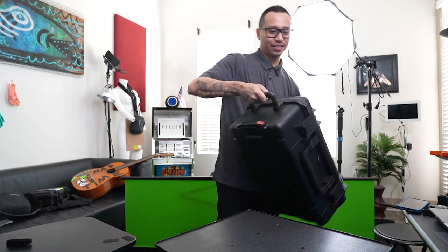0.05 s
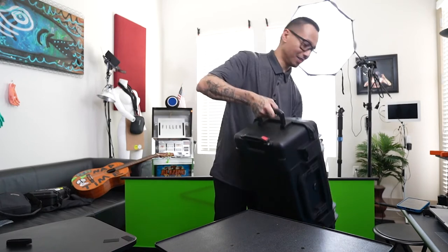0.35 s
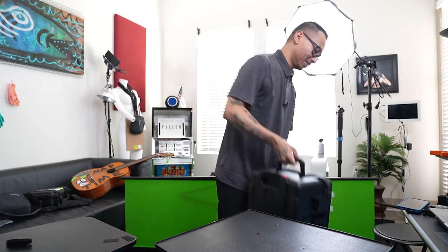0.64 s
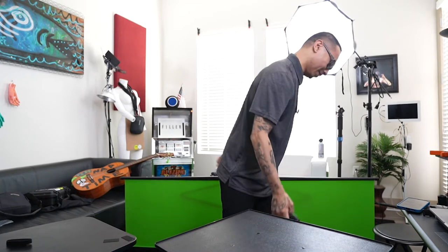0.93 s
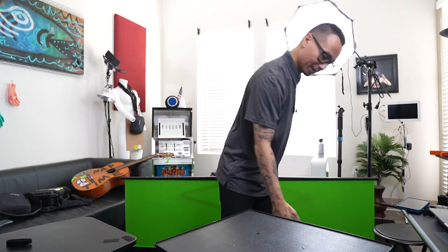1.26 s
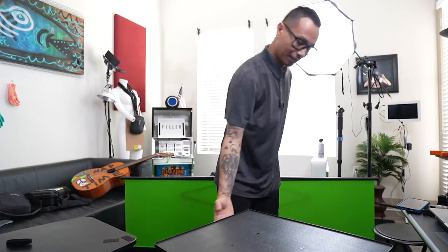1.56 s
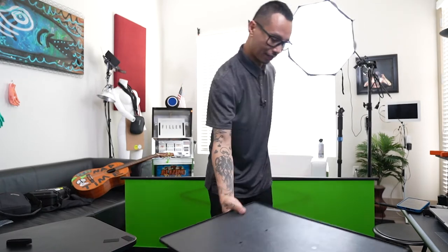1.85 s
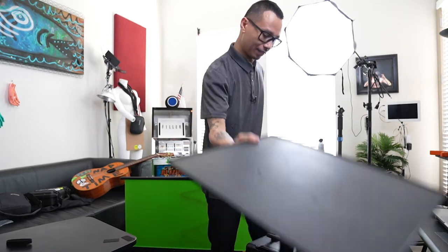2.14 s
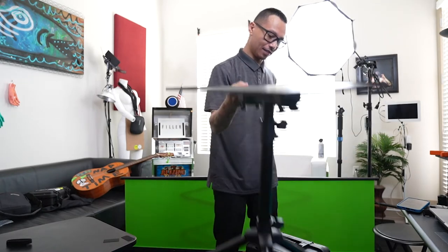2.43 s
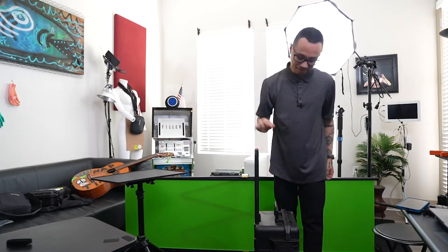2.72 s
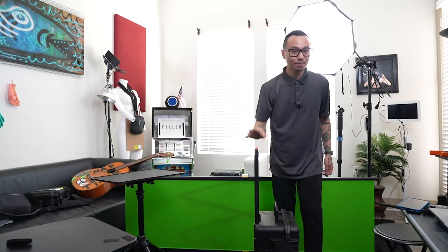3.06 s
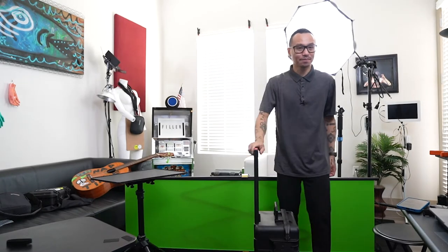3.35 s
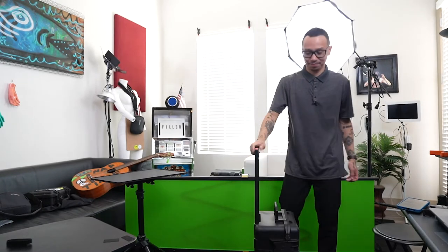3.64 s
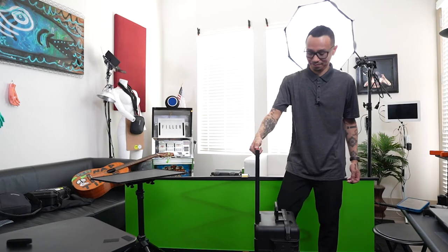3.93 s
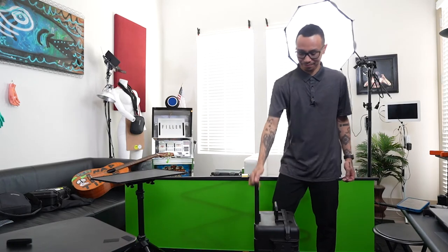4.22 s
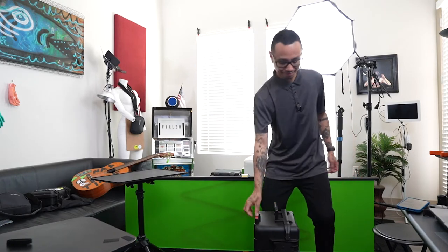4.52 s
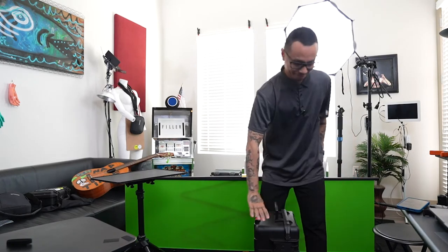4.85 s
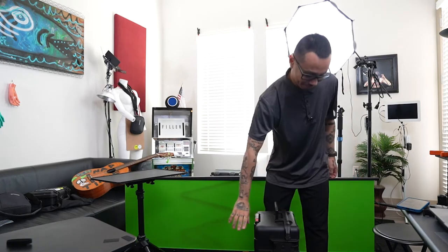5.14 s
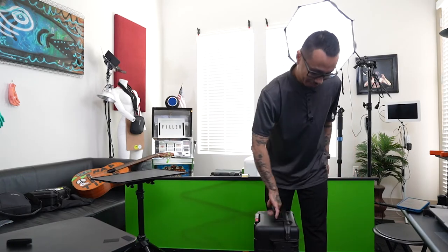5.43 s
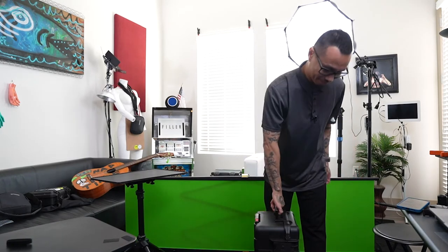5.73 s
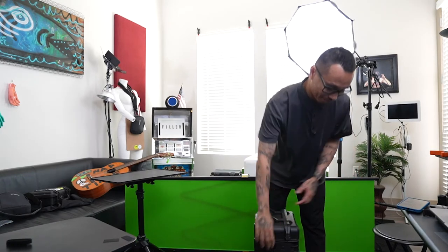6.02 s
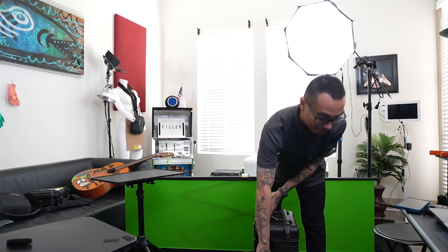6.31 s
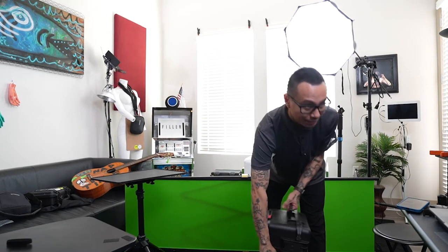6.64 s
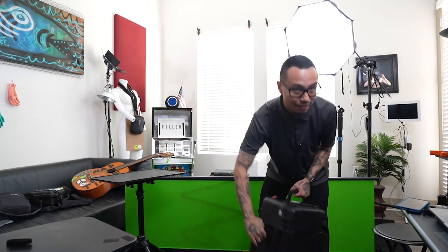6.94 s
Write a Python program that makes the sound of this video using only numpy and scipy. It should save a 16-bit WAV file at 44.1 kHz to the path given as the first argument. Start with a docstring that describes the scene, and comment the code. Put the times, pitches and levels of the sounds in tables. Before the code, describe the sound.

A knock and a brush of clothing open the scene as a hard plastic case is handled close to the microphone. At about 1.1 seconds the loaded case thumps onto the floor and rocks, filling the room with a short echo. A table top is bumped at 1.5 seconds, and its metal stand lands with a loud, ringing clang at 2 seconds, then a lighter knock at 2.5. Around 3 to 3.2 seconds the case's telescopic handle clacks out to its stop. From 4.1 to 4.5 seconds it scrapes back down its guides with several snaps, and after a brief rustle it slams shut at about 5.1. From there until nearly 7 seconds, hands knock irregularly on the hollow shell, latches click and clothes rustle softly. A faint, low room hush lies underneath.

```python
"""A live room, one microphone, a hard plastic case handled close by. The loaded case is swung off a table
and thumps onto the floor; the table on its stand is grabbed, shoved aside and lands with a clang. The
telescopic handle is pulled out, scrapes back down its guides and slams shut; then hands knock about on
the shell and latches while clothes rustle. Each blow is a burst of contact noise, the ring of the struck
body and the room's echo; rubbing is a stream of tiny slips."""
import sys
import numpy as np
from scipy import signal
from scipy.fft import rfft, irfft, next_fast_len
from scipy.io import wavfile
from scipy.ndimage import uniform_filter1d, map_coordinates

SR = 44100
rng = np.random.default_rng(int(sys.argv[2]) if len(sys.argv) > 2 else 0)


def to_wav(s):
    """Save 16-bit WAV."""
    ch = np.atleast_2d(s).T  # columns
    pcm = np.round(np.clip(ch, -1, 1) * 32767)  # PCM
    wavfile.write(sys.argv[1], SR, pcm.astype(np.int16))


N = 307451
TIME = np.arange(N) / SR
AGE = np.arange(SR) / SR  # seconds since a blow
DIP_START_S, DIP_END_S = 2.752, 2.772  # the level dips briefly

def amp(db):
    """Decibels to gain."""
    return 10 ** (np.asarray(db) / 20)

def unit(x):
    """Scale to rms 1."""
    return x / np.sqrt(np.mean(x ** 2) + 1e-20)

def normed(x):
    """Scale to energy 1."""
    return x / (np.linalg.norm(x) + 1e-20)

def along(points, hz):
    """Read (f/Hz, value) points on a log frequency axis."""
    f, values = np.transpose(points)
    return np.interp(np.log(hz + 1), np.log(f + 1), values)

def wobble(rate):
    """A smooth random curve, rate knots a second."""
    return map_coordinates(rng.standard_normal(int(N * rate / SR) + 4), [TIME * rate])

def filtered(x, response):
    """Filter x by a gain given as a function of frequency."""
    size = next_fast_len(len(x) + SR // 4)
    return irfft(rfft(x, size) * response(np.fft.rfftfreq(size, 1 / SR)), size)[:len(x)]

def coloured(x, spectrum):
    """Shape x by a (f/Hz, level/dB) spectrum, at rms 1."""
    return unit(filtered(x, lambda hz: amp(along(spectrum, hz))))

def slips(rate, hiss):
    """Friction: tiny slips of uneven size, rate a second, over a smooth hiss."""
    grains = (rng.random(N) < rate / SR) * rng.standard_normal(N)
    return unit(grains) + hiss * rng.standard_normal(N)

def stroke(start, end, rise_db_per_s=700, fall_db_per_s=232):
    """Gain of one movement: it swells up to its start, holds, and dies away after its end."""
    return amp(-rise_db_per_s * np.maximum(start - TIME, 0) - fall_db_per_s * np.maximum(TIME - end, 0))

def progress(start, end):
    """An even ramp from 0 to 1 between two times."""
    return np.clip((TIME - start) / (end - start), 0, 1)

def arch(start, end):
    """A rounded swell between two times."""
    return np.sqrt(np.abs(np.sin(np.pi * progress(start, end))))

# The quiet room at the microphone: f/Hz, level/dB
ROOM_HUSH = [(15, -37), (25, -26), (164, -2), (281, -2), (368, -17.5), (598, -6), (945, -15), (2170, -16.5),
             (4040, -27.5), (13500, -33.5), (15500, -37)]
def room_tone(level_db=-52.5):
    """The room's steady low hush."""
    return amp(level_db) * coloured(rng.standard_normal(N), ROOM_HUSH)

# Strokes of cloth and hand: start t/s, end t/s, relative rustle, hiss and rumble level/dB
HAND_STROKES = [(0.0, 0.027, -29.5, -32, -23.5), (0.094, 0.438, -36.5, -51.5, -36.5),
                (0.407, 0.482, -39, -43.5, -44), (0.547, 0.88, -53, -69, -45.5),
                (0.863, 0.876, -64, -52.5, -44.5), (1.4, 2.7, -56, -62.5, -51),
                (3.982, 4.044, -43, -61, -44), (4.73, 4.9, -45, -60, -44), (5.3, 5.773, -53.5, -61, -54),
                (5.8, 5.937, -49, -54, -46), (5.993, 6.154, -55.5, -62, -58),
                (6.217, 6.255, -34, -40.5, -26), (6.308, 6.56, -42.5, -55, -35),
                (6.635, 6.77, -50, -54.5, -46.5), (6.79, 6.912, -43, -46, -52)]
# Spectra of the rustle, the hiss of brisk strokes and the jostled case: f/Hz, level/dB
CLOTH_RUSTLE = [(410, -17), (700, -8), (1050, -5.5), (1780, 3.5), (1920, 3), (2160, 3.5), (3270, -4.5),
                (4890, -10.5), (12900, -31.5), (15500, -35)]
FIBRE_HISS = [(1000, -35), (2800, 0), (5500, 1.5), (8000, -6), (12500, -11.5), (15500, -17)]
CASE_RUMBLE = [(24, -54), (40, -56), (69, -25), (113, 13), (178, 13.5), (227, 12.5), (483, 6), (533, 4),
               (1200, -5), (1560, -78), (2640, -120)]
def handling(rustle_db=-1, hiss_db=-1, rumble_db=-3):
    """Close up, cloth brushes the shell in clumps of tiny slips while the case rumbles in the hand."""
    rustle, hiss, rumble = sum(np.outer(amp(levels_db), stroke(start, end))
                               for start, end, *levels_db in HAND_STROKES)
    cloth = coloured(slips(rate=1700, hiss=1.42), CLOTH_RUSTLE) * amp(rustle_db + 1.7 * wobble(35))
    fibres = coloured(slips(rate=3000, hiss=1.3), FIBRE_HISS) * amp(hiss_db + 2.9 * wobble(50))
    jostle = coloured(slips(rate=220, hiss=0.86), CASE_RUMBLE) * amp(rumble_db + 4.7 * wobble(13))
    return rustle * cloth + hiss * fibres + rumble * jostle

# Surfaces catching: start t/s, end t/s, centre f/Hz, level/dB
SURFACE_CHAFES = [(0, 0.078, 5800, -34), (0.166, 0.304, 1750, -39.5), (0.46, 0.534, 1740, -36.5),
                  (1.748, 1.778, 1400, -43), (1.832, 1.96, 1580, -45.5), (4.052, 4.17, 1410, -30),
                  (4.727, 4.893, 2140, -42)]
def chafing(relative_width=0.13):
    """A catching surface sings briefly in one rough, narrow band."""
    out = np.zeros(N)
    for start, end, hz, db in SURFACE_CHAFES:
        band = filtered(rng.standard_normal(N), lambda f: 1 / (1 + ((f / hz - 1) / relative_width) ** 4))
        out += amp(db) * arch(start, end) * unit(band)
    return out

# The room's reverberation time: f/Hz, t60/s
ROOM_DECAY = [(100, 0.54), (260, 0.78), (700, 0.77), (1800, 0.83), (5000, 0.81), (12000, 0.43)]
# Tone of its echo: f/Hz, level/dB
ROOM_TIMBRE = [(50, -27), (100, -10), (150, 1), (500, 0), (2000, 1), (5000, -3), (12000, -1)]
def room_tail(colour, hold_s=0.074):
    """The room answers a blow: dense echoes hold a moment, then die away."""
    hz, t, noise = signal.stft(rng.standard_normal(SR), SR, nperseg=512)
    fall_db = -60 * (np.hypot(t, hold_s) - hold_s) / along(ROOM_DECAY, hz)[:, None]
    tone_db = along(colour, hz) + along(ROOM_TIMBRE, hz)
    _, tail = signal.istft(noise * amp(fall_db + tone_db[:, None]), SR, nperseg=512)
    return normed(tail[:SR])

def ringing(modes, detune):
    """Damped modes, struck at slightly new strengths; the place of the blow shifts their pitch."""
    pitch = 1 + detune * rng.uniform(-1, 1)
    return sum(amp(db + rng.normal(0, 0.57) - 60 * AGE / t60) * np.sin(2 * np.pi * pitch * hz * AGE)
               for hz, db, t60 in modes)

# Edges of a blow's four bands (thud, knock, clack, click): f/Hz
BAND_EDGES = [65, 260, 900, 3500, 13500]
def blows(rows, modes, colour, ring_db, room_db, room_ring_db, detune=0):
    """Each blow is a burst of small contacts, the ring of the struck body, and the room's echo of both."""
    out = np.zeros(N + SR)
    bands = [signal.butter(3, edges, "band", fs=SR, output="sos")
             for edges in zip(BAND_EDGES, BAND_EDGES[1:])]
    for start, *levels_db, contact_s in rows:
        contact_age = AGE / contact_s
        rise = 1 - np.exp(-contact_age ** 2 / 2)
        crack = normed(coloured(rng.standard_normal(SR), colour) * rise * np.exp(-contact_age))
        ring = normed(ringing(modes, detune) * rise)
        ring_echo = normed(signal.fftconvolve(ring, room_tail(ROOM_TIMBRE))[:SR])
        echo = (room_tail(colour) + amp(room_ring_db) * ring_echo) * rise * (1 - np.exp(-AGE / 0.0014))
        heard = crack + amp(ring_db) * ring + amp(room_db) * echo
        if start < DIP_START_S:
            heard *= start + AGE < DIP_START_S  # the tail breaks off at the dip
        for band, db in zip(bands, levels_db):  # where and how hard it lands sets its colour
            part = signal.sosfilt(band, heard)
            peak_rms = np.sqrt(uniform_filter1d(part[:SR // 8] ** 2, size=441).max())
            out[round(start * SR):][:SR] += amp(db) * part / peak_rms
    return out[:N]

def touched(rows, touch):
    """Light blows: the hardness of the touch shares each one's level out among the bands."""
    soft_db, hard_db = np.transpose(touch)
    return [(start, *(db + soft_db + hardness * (hard_db - soft_db)), contact_s)
            for start, db, hardness, contact_s in rows]

# The handle's jolts: t/s, thud, knock, clack and click level/dB, contact t/s
HANDLE_HITS = [(0.002, -29, -28, -31.5, -36, 0.002), (2.979, -30.5, -29, -27.5, -40, 0.014),
               (3.204, -24.5, -25, -24, -34.5, 0.011), (5.083, -27, -23.5, -18.5, -33, 0.0055)]
# Its ringing modes: f/Hz, level/dB, t60/s
HANDLE_MODES = [(97.7, -9, 0.96), (159.4, -1, 0.15), (272, -18.5, 0.19), (386, 4, 0.076), (604, -2.5, 0.09),
                (986, -16, 0.081), (2000, -20, 0.0042)]
# Its crowd of dense, damped modes: f/Hz, level/dB
HANDLE_TIMBRE = [(35, -56), (60, -34), (83, -20), (107, -9.5), (385, 2.5), (497, -1.5), (657, 0), (756, -7),
                 (1550, -13), (1740, -13.5), (2780, -17), (7200, -22), (15500, -38)]
def handle_clatter():
    """The telescopic tubes rattle and reach their stops, with plenty of room behind them."""
    return blows(HANDLE_HITS, HANDLE_MODES, HANDLE_TIMBRE, ring_db=-3.5, room_db=9, room_ring_db=-16)

# Bumps on the shell: t/s, level/dB, hardness 0-1, contact t/s
SHELL_HITS = [(0.279, -36.5, 1, 0.0028), (1.319, -28, 1, .002), (2.075, -18, 0.44, 0.00047),
              (3.903, -26.5, 0.41, 0.0084), (4.257, -25, 0.2, 0.0088), (4.19, -32, .05, 0.0022),
              (4.51, -27.5, 0.56, 0.0021), (4.712, -23, 0.48, 0.0057), (4.982, -24.5, 0.02, 0.0083),
              (5.095, -19, 0.4, 0.0015), (5.111, -17.5, 0.6, .0008), (5.428, -26, 0.65, 0.00077),
              (5.51, -17.5, 1, 0.00028), (5.637, -26, 1, 0.00094), (5.841, -27, 0.5, 0.00052),
              (5.986, -40.5, 0.2, 0.0014), (6.197, -21, 0.08, 0.0021), (6.212, -24, 0, 0.00028),
              (6.384, -20, 0.86, 0.00015), (6.446, -24.5, 0.45, .0006), (6.265, -34, .45, 0.0076),
              (6.732, -28, 0, 0.0054), (6.775, -32.5, 0.27, 0.002)]
# Offset of each band, thud to click: soft level/dB, hard level/dB
SHELL_TOUCH = [(1, -1), (-9, 3), (-13.5, -7), (-33.5, -28.5)]
# The shell's ringing modes: f/Hz, level/dB, t60/s
SHELL_MODES = [(150.8, -3.5, 0.18), (256.5, -8, 0.069), (381, -3.5, 0.038), (649, 0, 0.031),
               (733, -14.5, 0.037), (1430, 9.5, 0.009)]
# Its dense, damped modes: f/Hz, level/dB
SHELL_TIMBRE = [(35, -59), (60, -12), (139, -9.5), (215, -15.5), (320, -7.5), (642, -15), (1170, -19),
                (1450, -21), (3840, -31), (10700, -34.5), (15500, -57)]
def shell_knocks():
    """Hands, grip and once the stand's leg bump the plastic shell near the microphone, each time in a new spot."""
    hits = touched(SHELL_HITS, SHELL_TOUCH)
    return blows(hits, SHELL_MODES, SHELL_TIMBRE, ring_db=7.5, room_db=1.5, room_ring_db=-6.5, detune=0.09)

# Snaps: t/s, level/dB, hardness 0-1, contact t/s
LATCH_HITS = [(0.842, -36.5, 0.04, .0006), (1.112, -40, 0.1, 0.00067), (2.531, -21.5, .15, 0.00072),
              (3.229, -17.5, 0.1, 0.00092), (4.249, -20, 0.46, 0.002), (4.343, -27.5, 0.5, .0008),
              (4.388, -24.5, .25, 0.0014), (4.429, -25.5, 0.83, 0.0018), (4.911, -41.5, 0.9, 0.00051),
              (6.334, -37.5, 0.7, 0.0045), (6.445, -21, 0.02, 0.0021), (6.486, -33.5, 1, 0.0023)]
# Offset of each band, thud to click: soft level/dB, hard level/dB
LATCH_TOUCH = [(3.5, -38), (3.5, -9), (0, 6.5), (-20.5, -26)]
# A latch's ringing modes: f/Hz, level/dB, t60/s
LATCH_MODES = [(146.5, -10, 0.22), (334, 5.5, 0.021), (1020, 6, 0.011), (1336, -21, 0.048),
               (2490, -11, 0.028), (3880, -19, 0.021), (7550, -13, 0.0048)]
def latch_snaps():
    """Catches, joints and latches snap, close and fairly dry."""
    hits = touched(LATCH_HITS, LATCH_TOUCH)
    return blows(hits, LATCH_MODES, HANDLE_TIMBRE, ring_db=-0.5, room_db=-6, room_ring_db=-6)

# The case meets the floor: t/s, thud, knock, clack and click level/dB, contact t/s
CASE_HITS = [(1.121, -15.5, -19.5, -19, -34.5, 0.0048), (1.141, -15, -25.5, -27.5, -33.5, 0.0041),
             (1.208, -25, -29.5, -26, -47, 0.0017)]
# The loaded case's ringing modes: f/Hz, level/dB, t60/s
CASE_MODES = [(151.7, 4.5, 0.094), (222, -5.5, 0.074), (742, -20, 0.029), (1120, -9, 0.024),
              (1530, -19, 0.044)]
# Its dense, damped modes: f/Hz, level/dB
CASE_TIMBRE = [(35, -53), (60, -42), (167, -7), (231, 2), (272, -21.5), (497, 1), (546, -6), (810, -11),
               (910, -16), (1520, -16), (2010, -25.5), (2650, -25), (15500, -50)]
def case_drop():
    """The loaded case lands and rocks; its thump fills the room."""
    return blows(CASE_HITS, CASE_MODES, CASE_TIMBRE, ring_db=-6.5, room_db=6, room_ring_db=-11.5)

# Ticks of the fittings: t/s, click level/dB
FITTING_HITS = [(1.319, -38), (1.492, -49), (2.074, -38), (3.229, -28.5), (5.091, -34), (5.509, -40.5),
                (5.635, -44), (5.642, -37.5), (6.199, -39), (6.518, -42.5)]
# Their bright spectrum: f/Hz, level/dB
FITTING_TIMBRE = [(60, -20), (300, -1), (3000, -9), (6000, 2.5), (11000, -7), (15500, -12)]
def fitting_ticks(band_offsets_db=(-24, -6, 0, 0), contact_s=0.0012):
    """Loose fittings tick sharply when the case is jolted, close up with little room."""
    hits = [(start, *np.add(db, band_offsets_db), contact_s) for start, db in FITTING_HITS]
    return blows(hits, LATCH_MODES, FITTING_TIMBRE, ring_db=-22, room_db=-12.5, room_ring_db=-12)

# Bumps on the table: t/s, thud, knock, clack and click level/dB, contact t/s
TABLE_HITS = [(1.468, -33, -17.5, -30, -43, 0.0069), (1.491, -21, -23.5, -25.5, -43, 0.0037),
              (1.768, -32.5, -30.5, -43.5, -61, 0.0047), (1.999, -23, -28, -47, -53, 0.0048)]
# The top's ringing modes: f/Hz, level/dB, t60/s
TABLE_MODES = [(100.5, -16.5, 1), (197, -17, 0.74), (250, -8.5, 0.48), (298, -1.5, 0.3), (349, -2, 0.34),
               (474, -9.5, 0.32), (600, -10, 0.43), (864, -9.5, 0.18), (1460, -4.5, 0.13),
               (1940, -7.5, 0.15)]
# Its dense, damped modes: f/Hz, level/dB
TABLE_TIMBRE = [(35, -58), (60, -38), (91, -4), (231, -11.5), (253, -20), (343, -3.5), (394, -8.5),
                (869, -13), (1120, -18), (1480, -21), (15500, -44)]
def table_bumps():
    """The table top rings as it is grabbed and lifted."""
    return blows(TABLE_HITS, TABLE_MODES, TABLE_TIMBRE, ring_db=4.5, room_db=1.5, room_ring_db=-5)

# The stand's legs land: t/s, thud, knock, clack and click level/dB, contact t/s
LEG_HITS = [(2.032, -10, -14, -14.5, -35, 0.0066), (2.531, -22.5, -26, -26, -50, 0.0016)]
# The stand's ringing modes: f/Hz, level/dB, t60/s
STAND_MODES = [(148.3, 6.5, 0.41), (223, -23, 0.134), (336, -12, 0.39), (724, 3, 0.1), (1140, -29, 0.21),
               (1235, -19, 0.13), (1306, -4.5, 0.42), (2337, 16, 0.026), (5200, -14, 0.016)]
# Its dense, damped modes: f/Hz, level/dB
STAND_TIMBRE = [(35, -52), (60, -44), (142, 8.5), (179, -8.5), (335, -10), (497, -13), (869, -17),
                (1230, -10), (1480, -18.5), (2310, -22.5), (3760, -34), (4850, -28), (15500, -59)]
def stand_clang():
    """The stand clangs on the floor; the microphone gets more room than direct sound."""
    return blows(LEG_HITS, STAND_MODES, STAND_TIMBRE, ring_db=7, room_db=12, room_ring_db=-9.5)

def wall_rub(travel, positions=4, ring_s=0.0037):
    """Slips ring the thin tube walls, whose many broad modes change as the handle travels in."""
    out = np.zeros(N)
    for k in range(positions):
        walls = rng.standard_normal(SR // 10) * np.exp(-AGE[:SR // 10] / ring_s)
        share = np.clip(1 - np.abs(travel * (positions - 1) - k), 0, 1)
        out += np.sqrt(share) * unit(signal.fftconvolve(slips(rate=2500, hiss=0.88), walls)[:N])
    return out

# Resonances of the handle's tubes: f/Hz, width/Hz, level/dB
TUBE_RESONANCES = [(920, 420, 4), (1470, 130, 3), (2100, 910, 3.5), (3700, 510, -7.5)]
def tube_response(f):
    """The tubes' resonances add with alternating sign."""
    return sum((-1) ** k * amp(db) * 1j * f * width / (centre ** 2 - f ** 2 + 1j * f * width)
               for k, (centre, width, db) in enumerate(TUBE_RESONANCES))

# Spectra of the scraping guides and the shaken shell: f/Hz, level/dB
GUIDE_SCRAPE = [(120, -34), (200, 1), (249, -30), (365, -2.5), (641, -21.5), (1400, -2), (2960, -14),
                (3610, -7), (5910, -21.5), (11000, -21.5), (15500, -44)]
SHELL_SHAKE = [(50, -45), (100, -15), (165, 5.5), (215, -5.5), (300, -24), (420, -14), (900, -28),
               (3000, -70)]
def handle_slide(start=4.092, end=4.517, scrape_db=-28, tube_db=-3, shake_db=-35, dulling_db_per_s=10):
    """The tubes scrape down their guides, sing at their resonances and shake the shell."""
    rub = wall_rub(progress(start, end)) + 0.75 * slips(rate=900, hiss=1.2)
    scrape = unit(coloured(rub, GUIDE_SCRAPE) + amp(tube_db) * unit(filtered(rub, tube_response)))
    treble = filtered(scrape, lambda f: f ** 2 / (f ** 2 + 5000 ** 2))
    shake = coloured(slips(rate=110, hiss=0.32), SHELL_SHAKE)
    push = stroke(start, end, rise_db_per_s=264, fall_db_per_s=135)
    # The treble swells more steeply than the rest and fades along the slide.
    treble_gain = push ** 1.54 * amp(2 - dulling_db_per_s * np.maximum(TIME - start, 0))
    judder = amp(scrape_db + wobble(45))
    return judder * (push * (scrape - treble) + treble_gain * treble) + amp(shake_db) * push * shake

# Pitch path of the grip's squeak: t/s, f/Hz
SQUEAK_PITCH = [(4.745, 11800), (4.782, 14200), (4.83, 11800), (4.865, 13300), (4.905, 11100)]
def grip_squeak(level_db=-64.5, waver=0.024):
    """The grip sticks and slips in one thin, gliding whistle."""
    times, hz = np.transpose(SQUEAK_PITCH)
    glide = uniform_filter1d(np.interp(TIME, times, hz), size=1000)
    pitch = glide * (1 + waver * wobble(900))
    return amp(level_db) * arch(times[0], times[-1]) * np.sin(2 * np.pi * np.cumsum(pitch) / SR)

def scene(low_cut_hz=78, dip_db=-12):
    """All sources at one microphone; the level dips briefly after the stand lands."""
    heavy = case_drop() + table_bumps() + stand_clang() + handle_clatter()
    light = shell_knocks() + latch_snaps() + fitting_ticks()
    low_cut = signal.butter(2, low_cut_hz, "high", fs=SR, output="sos")  # the deepest bass is cut away
    impacts = signal.sosfilt(low_cut, heavy + light)
    friction = handle_slide() + handling() + chafing() + grip_squeak()
    dip = amp(dip_db * ((TIME > DIP_START_S) & (TIME < DIP_END_S)))
    return (dip * (impacts + friction + room_tone()))[None]

def record(dry):
    """The mono recorder keeps nothing above its band limit."""
    top_hz = 15750
    return filtered(dry[0], lambda hz: hz < top_hz)[None]

dry = scene()
out = record(dry)
to_wav(out)
```